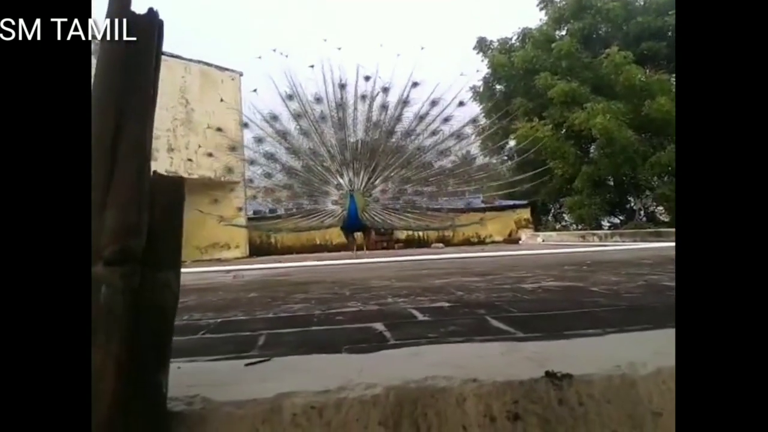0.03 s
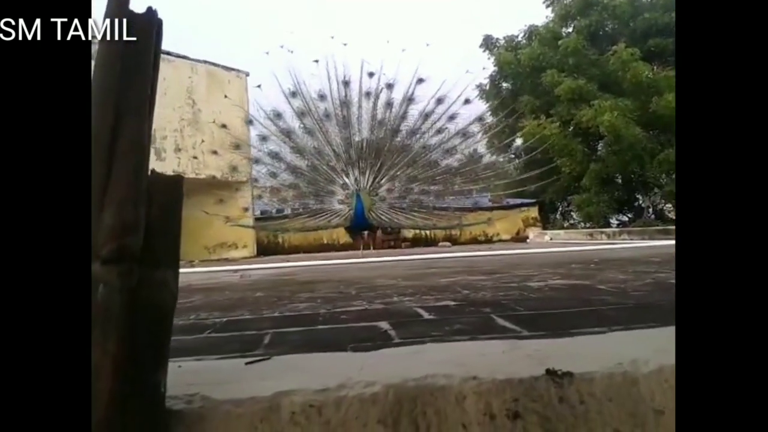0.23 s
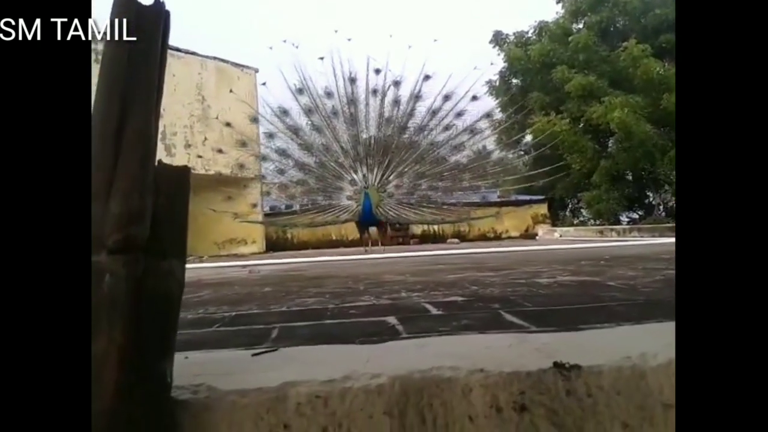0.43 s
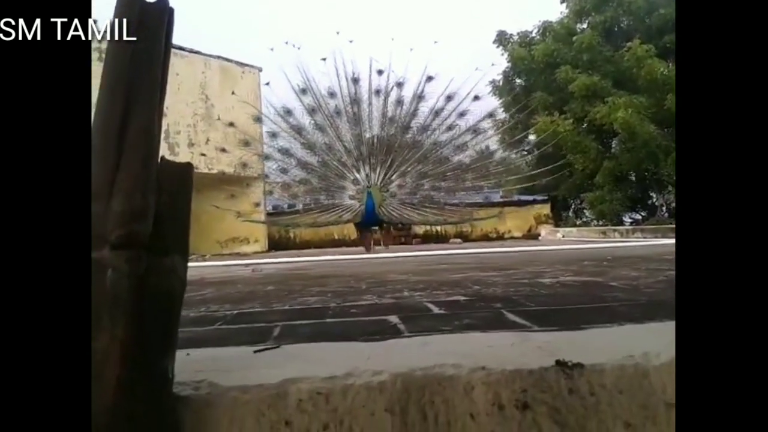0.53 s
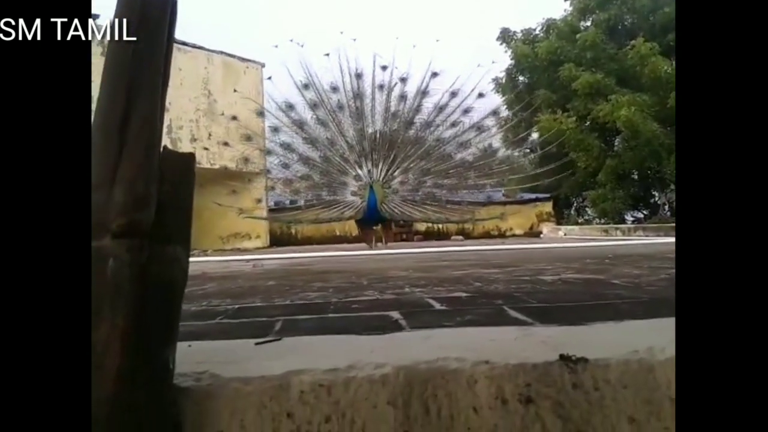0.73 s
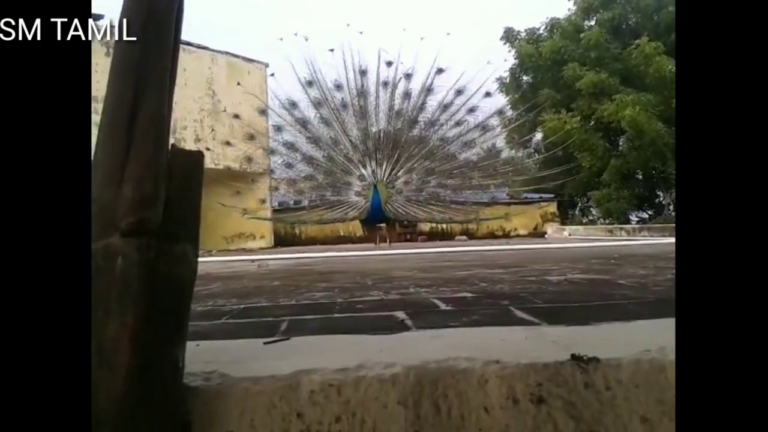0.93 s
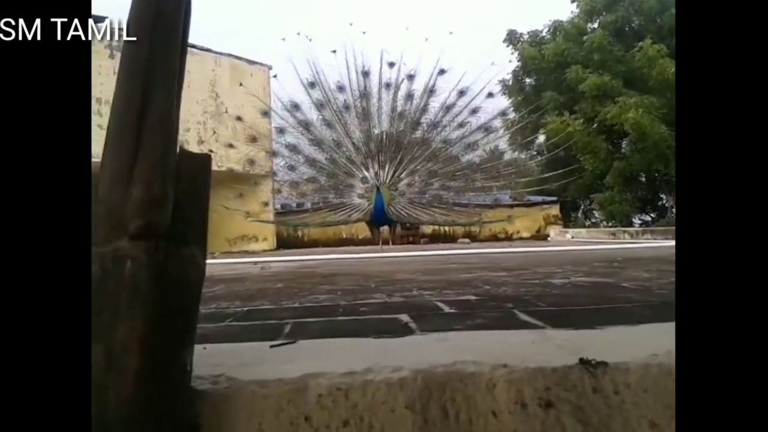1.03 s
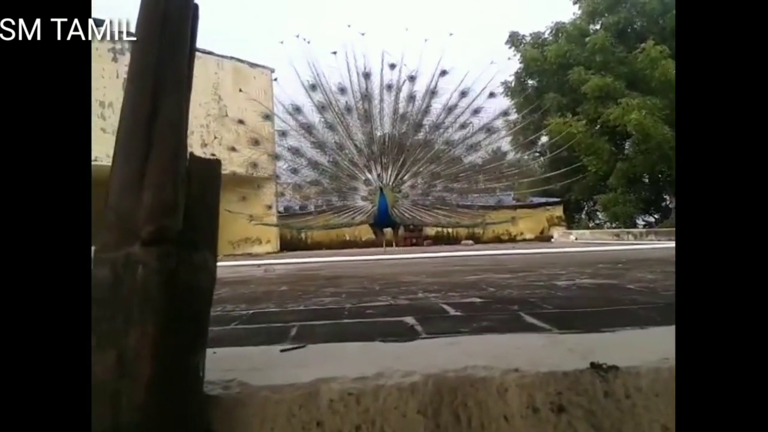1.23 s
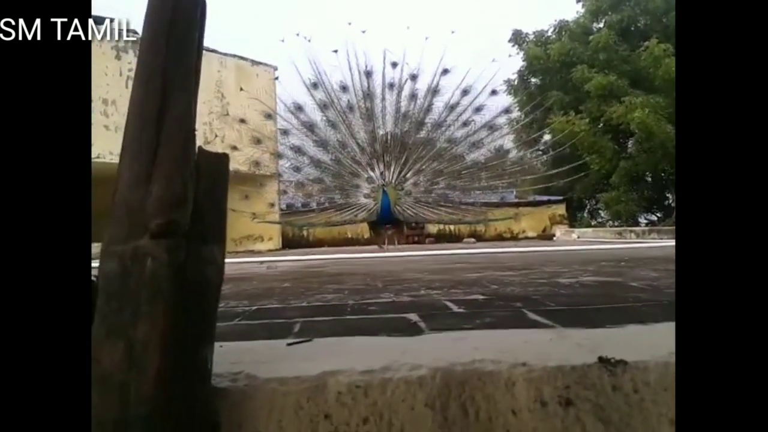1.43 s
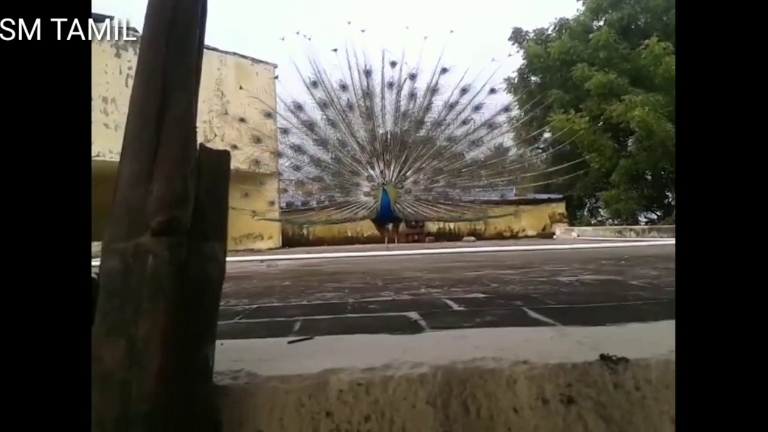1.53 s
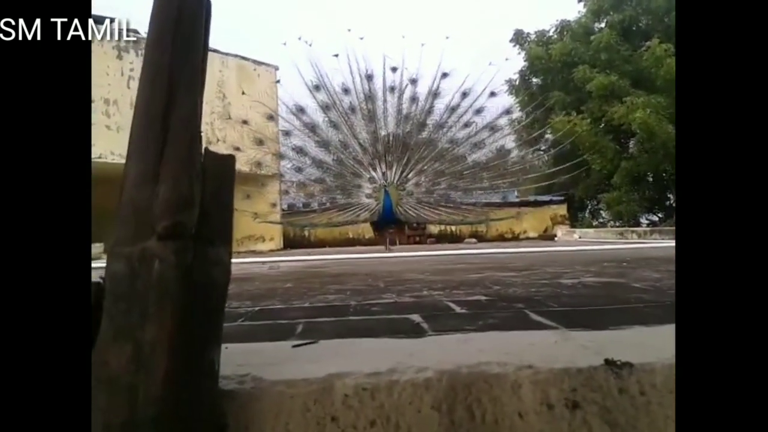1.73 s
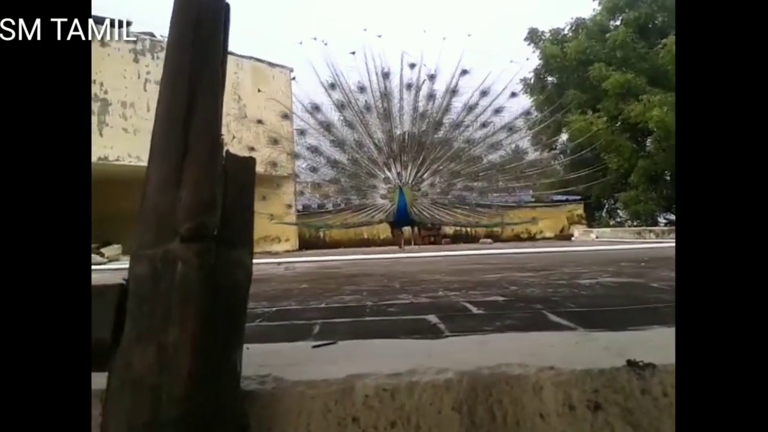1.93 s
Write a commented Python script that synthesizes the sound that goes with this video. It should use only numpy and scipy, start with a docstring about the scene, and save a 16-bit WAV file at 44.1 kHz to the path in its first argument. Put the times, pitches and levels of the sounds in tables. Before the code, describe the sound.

On an open roof, a peacock cries loudly twice, about a second apart, each harsh call ringing briefly and distorting the microphone with a low thump. In the pause a distant small bird whistles once against faint outdoor noise.

```python
"""Flat roof between walls: a peacock gives two loud, harsh cries while an earlier one still dies away.
Each cry is one pitch arch of syrinx pulses that cracks at its end, rings between the walls and
overloads the microphone, which thumps low just after each loud cry begins.
A small bird whistles once in the pause, over faint outdoor noise. The overall level sinks slowly."""
import sys
import numpy as np
from scipy import signal
from scipy.fft import rfft, irfft
from scipy.io import wavfile
from scipy.ndimage import uniform_filter1d

SR = 44100
rng = np.random.default_rng(int(sys.argv[2]) if len(sys.argv) > 2 else 0)


def to_wav(s):
    """Save 16-bit WAV."""
    ch = np.atleast_2d(s).T  # columns
    pcm = np.round(np.clip(ch, -1, 1) * 32767)  # PCM
    wavfile.write(sys.argv[1], SR, pcm.astype(np.int16))


N = 88200


def peacock(lead_s=0.5):
    """Cries pass the throat, then arrive directly, off floor and walls, and as a diffuse ring."""
    # pitch arches: t/s, f/Hz
    earlier_pitch = [(-0.42, 580), (-0.32, 687.6), (-0.2, 700.6), (-0.1, 676.6), (-0.035, 564.6)]
    first_pitch = [(0.161, 583), (0.169, 579.4), (0.217, 657), (0.261, 690.4), (0.295, 699.8),
                   (0.401, 710.5), (0.465, 671.6), (0.517, 627), (0.541, 567.3)]
    second_pitch = [(1.209, 571), (1.221, 573.5), (1.265, 633.6), (1.307, 669.8), (1.379, 698.6),
                    (1.479, 711.6), (1.593, 696.4), (1.685, 629.6), (1.738, 564)]
    # floor and wall reflections: delay/s, level/dB
    reflections = [(.0071, -18.5), (.0183, -13.5), (.031, -18.5), (.047, -36)]
    cries = [cry(earlier_pitch, effort_db=-10.5, open_s=0.04, fade_db=-0.29),
             cry(first_pitch, effort_db=-8, open_s=0.028, fade_db=-1.3),
             cry(second_pitch, effort_db=-8, open_s=0.039, fade_db=-2.5)]
    lead = round(lead_s * SR)  # room for the cry before t = 0
    source = np.zeros(lead + N)
    for start_s, sound in cries:
        first = max(lead + round(start_s * SR), 0)
        source[first:first + len(sound)] += sound
    direct = colour(source, throat_db)
    echoes = sum(amp(db) * delay(direct, delay_s)[:len(direct)] for delay_s, db in reflections)
    return (direct + echoes + yard_ring(direct))[lead:]


def cry(pitch, effort_db, open_s, fade_db, harmonics=22):
    """Syrinx pulses: dull until the beak opens, briefly strained, clean on top, cracking at the end."""
    attack_s, release_s, strain_s, crack_s = 0.013, 0.014, 0.018, 0.02
    shut_db, strain_db, crest_db, crack_db = 2, 2.5, 7.5, -9
    dull_db_per_khz, dull_above_hz = -5.5, 1530
    crest_above_hz, crest_span_hz = 679, 60.4
    rasp_db, crack_rasp_db = -62, -26
    start_s, end_s = pitch[0][0], pitch[-1][0]
    t = np.arange(start_s, end_s + release_s / 2, 1 / SR)
    shut = soft_step(start_s + open_s - t, width_s=0.0021)
    strain = np.exp(-((t - start_s - open_s - strain_s) / strain_s) ** 2)
    crack = soft_step(t - end_s + crack_s, width_s=0.011)

    arch_hz = uniform_filter1d(at_time(pitch, t), size=900, mode="nearest")
    jitter = 0.0003 + 0.004 * strain + 0.016 * crack
    hz = arch_hz * (1 + jitter * wander(len(t), hz=200))
    cycles = np.cumsum(hz) / SR
    closure = shut + 0.21 * crack  # beak partly shuts again
    pulses = np.zeros(len(t))
    for k in range(1, harmonics + 1):
        excess_khz = np.maximum(k * arch_hz - dull_above_hz, 0) / 1000
        pulses += amp(closure * dull_db_per_khz * excess_khz) * np.sin(2 * np.pi * k * cycles)
    puffs = unit(np.exp(-(cycles % 1) / 0.35) * rng.standard_normal(len(t))) * np.sqrt(harmonics)
    rasp = puffs * (amp(rasp_db) + amp(crack_rasp_db) * crack)

    gate = np.clip((t - start_s) / attack_s, 0, 1) * np.clip((t[-1] - t) / release_s, 0, 1)
    crest = np.clip((arch_hz - crest_above_hz) / crest_span_hz, 0, 1)
    level_db = effort_db + shut_db * shut + strain_db * strain + crest_db * crest + crack_db * crack
    level_db += fade_db * (t - start_s) / (end_s - start_s)
    return start_s, gate * amp(level_db) * (pulses + rasp)


def throat_db(hz):
    """Broad voice colour plus narrow resonances."""
    # voice spectrum: f/Hz, level/dB
    voice = [(300, -39), (600, -12.5), (1250, -6.5), (1800, -3), (2500, -5.5), (3500, -8), (4500, -1),
             (5700, -4.5), (6400, -6.5), (7200, -31), (15000, -54)]
    # resonances of throat and surroundings: f/Hz, width/Hz, lift/dB
    resonances = [(706, 96, 5.5), (1179, 110, 5), (1336.7, 38, 12.5), (1930, 110, 2.5), (2111.8, 97, 13.5),
                  (2361, 71, 11.5), (2622.5, 96, 14), (2835, 61, 9), (3170, 124, 15.5), (3570, 203, 10),
                  (4087, 480, 3.5), (4620, 56, 9.5), (5638, 188, 10.5), (5995, 79, 9)]
    lift_db = sum(db / (1 + (2 * (hz - f) / width) ** 2) for f, width, db in resonances)
    return at_hz(voice, hz) + lift_db


def yard_ring(x, far_db=-14.5, near_db=-18, near_t60_s=0.18, predelay_s=0.012):
    """Diffuse ring: quick roof echoes, plus walls and trees with a decay time per band."""
    # courtyard decay: f/Hz, t60/s
    decay = [(300, 0.65), (800, 0.5), (2100, 0.58), (3500, 0.63), (5500, 0.43), (9000, 0.8)]
    hz, t, spectra = signal.stft(rng.standard_normal(SR), SR, nperseg=256)
    spectra *= amp(-60 * t / at_hz(decay, hz)[:, None])
    far = signal.istft(spectra, SR, nperseg=256)[1][:SR]
    near = rng.standard_normal(SR) * amp(-60 * np.arange(SR) / SR / near_t60_s)
    tail = (amp(far_db) * unit(far) + amp(near_db) * unit(near)) / np.sqrt(SR)
    return signal.fftconvolve(x, delay(tail, predelay_s))[:len(x)]


def small_bird(waver=0.0068, ring_boost_db=16):
    """Thin, distant whistle: climbs, slides down, holds."""
    # whistle contour: t/s, f/Hz, level/dB
    whistle = [(.85, 5000, -56), (.87, 5080, -38), (.915, 5500, -42), (.935, 6490, -45), (.952, 6460, -30),
               (.96, 7060, -61), (.985, 6640, -35.5), (1.01, 6280, -36), (1.04, 6220, -43),
               (1.08, 6300, -43), (1.12, 6280, -73)]
    t = np.arange(N) / SR
    hz = at_time(whistle, t) * (1 + waver * wander(N, hz=251))
    gate = (t > whistle[0][0]) & (t < whistle[-1][0])
    tone = gate * amp(at_time(whistle, t, column=2)) * np.sin(2 * np.pi * np.cumsum(hz) / SR)
    return tone + amp(ring_boost_db) * yard_ring(tone)


def low_thumps():
    """Low thumps of the overloaded microphone just after each loud cry begins; between them a faint thump from
    outdoors."""
    # thumps: t/s, half length/s, level/dB
    thumps = [(.215, 0.03, -16), (0.728, 0.041, -26), (1.28, 0.043, -13.5)]
    t = np.arange(N) / SR
    gain = sum(amp(db) * np.exp(-((t - at_s) / half_s) ** 2) for at_s, half_s, db in thumps)
    return gain * wander(N, hz=85)


def outdoors(air_db=-34, patch_db=1, hum_hz=394, hum_waver=0.012, hum_boost_db=12):
    """Patchy distant noise and a faint low hum."""
    # noise spectrum: f/Hz, relative density/dB
    air_spectrum = [(25, -21), (90, -19), (160, -3), (240, -10), (420, -4.5), (700, -5), (1100, -10),
                    (2200, -12), (3800, -17), (5500, -10), (6500, -28.5), (7300, -24.5), (10000, -31),
                    (15000, -43.5)]
    # hum envelope: t/s, level/dB
    hum_levels = [(.68, -75), (.73, -49), (.9, -53), (1.08, -53), (1.2, -70)]
    frames = dict(nperseg=1024, noverlap=768)
    hz, _, spectra = signal.stft(rng.standard_normal(N), SR, **frames)
    patches = uniform_filter1d(rng.standard_normal(spectra.shape), size=6, axis=0)
    patches = unit(uniform_filter1d(patches, size=16, axis=1))
    spectra *= amp(at_hz(air_spectrum, hz)[:, None] + patch_db * patches)
    air = unit(signal.istft(spectra, SR, **frames)[1][:N])

    t = np.arange(N) / SR
    hum_cycles = np.cumsum(hum_hz * (1 + hum_waver * wander(N, hz=40.34))) / SR
    hum = amp(hum_boost_db + at_time(hum_levels, t)) * np.sin(2 * np.pi * hum_cycles)
    return amp(air_db) * air + hum


def amp(db):
    """dB to gain."""
    return 10 ** (np.asarray(db) / 20)


def unit(x):
    """Scale to rms 1."""
    return x / np.sqrt(np.mean(x ** 2) + 1e-20)


def delay(x, delay_s):
    """Prepend silence."""
    return np.pad(x, (round(delay_s * SR), 0))


def soft_step(t, width_s):
    """Logistic rise from 0 to 1 around t = 0."""
    return 1 / (1 + np.exp(np.minimum(-t / width_s, 50)))


def at_hz(points, hz):
    """Interpolate over log frequency."""
    f, value = np.transpose(points)
    return np.interp(np.log(hz + 1), np.log(f + 1), value)


def at_time(points, t, column=1):
    """Interpolate one column over time."""
    rows = np.array(points)
    return np.interp(t, rows[:, 0], rows[:, column])


def wander(size, hz):
    """Noise low-passed at hz, rms 1."""
    f = np.fft.rfftfreq(size, 1 / SR)
    return unit(irfft(rfft(rng.standard_normal(size)) / (1 + (f / hz) ** 4), size))


def colour(x, db_at, size=8192):
    """Minimum-phase filter with gain db_at(hz)."""
    log_gain = np.log(amp(db_at(abs(np.fft.fftfreq(size, 1 / SR)))))
    response = np.exp(np.conj(signal.hilbert(log_gain)))
    taps = np.fft.ifft(response).real[:size // 2]
    return signal.fftconvolve(x, taps)[:len(x)]


def scene():
    """All sources at one microphone, both channels alike."""
    mono = peacock() + small_bird() + outdoors() + low_thumps()
    return np.array([mono, mono])


def record(dry, ceiling_db=-4.5, knee=2.8, oversample=4, cutoff_hz=15450):
    """Microphone overload adds harsh treble; then colour, sinking level and band limit."""
    # recorder response: f/Hz, level/dB
    response = [(20, -30.5), (100, -23.5), (300, -6.5), (1000, -4.5), (5000, -2), (8000, -3.5), (12000, -3),
                (15000, -0.5)]
    # overall gain: t/s, level/dB
    levels = [(0, -0.5), (.22, -1), (.35, -3.5), (.55, -.5), (1.25, -4.5), (1.45, -8), (1.7, -8.5),
              (2, -8.5)]
    drive = signal.resample_poly(dry.mean(0), oversample, 1) / amp(ceiling_db)
    clipped = drive / (1 + abs(drive) ** knee) ** (1 / knee)
    mono = amp(ceiling_db) * signal.resample_poly(clipped, 1, oversample)
    mono = colour(mono, lambda hz: at_hz(response, hz))
    mono *= amp(at_time(levels, np.arange(N) / SR))
    lowpass = signal.firwin(511, cutoff_hz, window=("kaiser", 9), fs=SR)
    mono = signal.fftconvolve(mono, lowpass, "same")
    return np.array([mono, mono])


dry = scene()
out = record(dry)
to_wav(out)
```